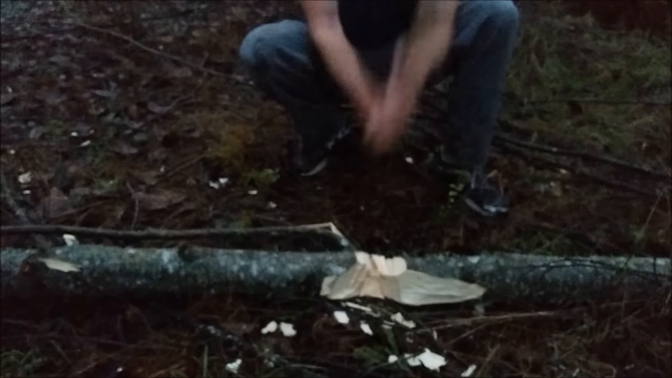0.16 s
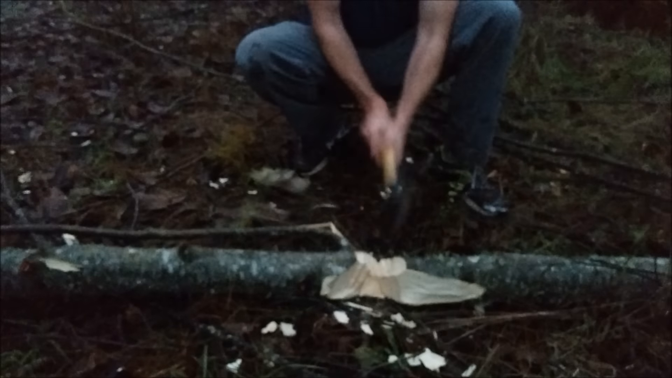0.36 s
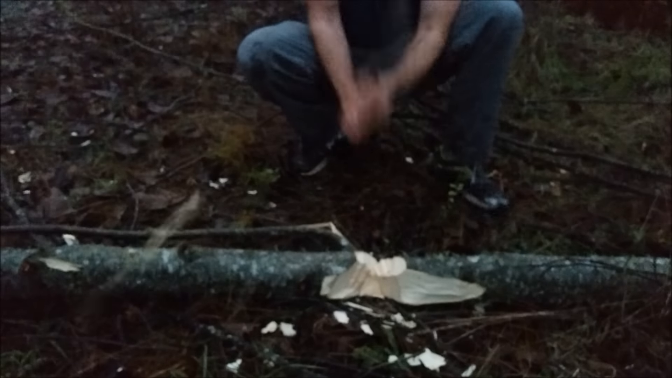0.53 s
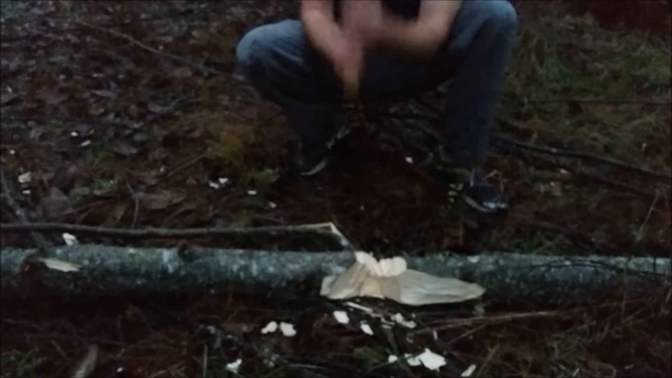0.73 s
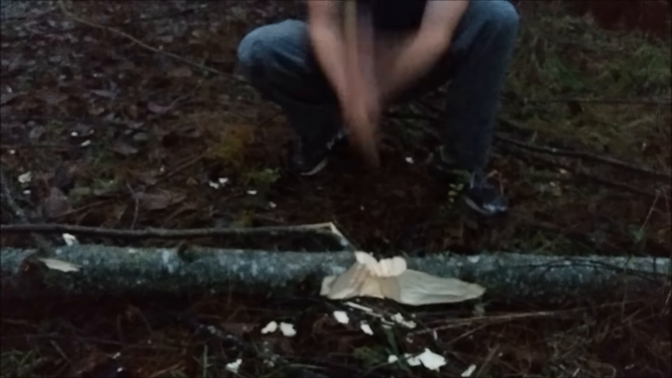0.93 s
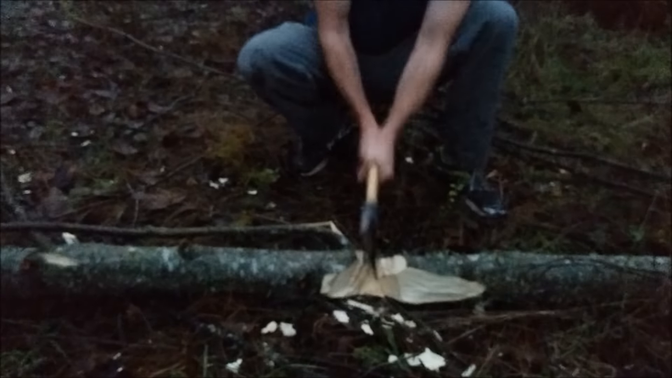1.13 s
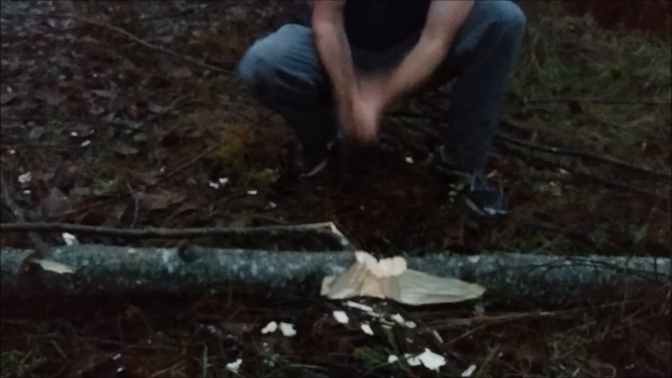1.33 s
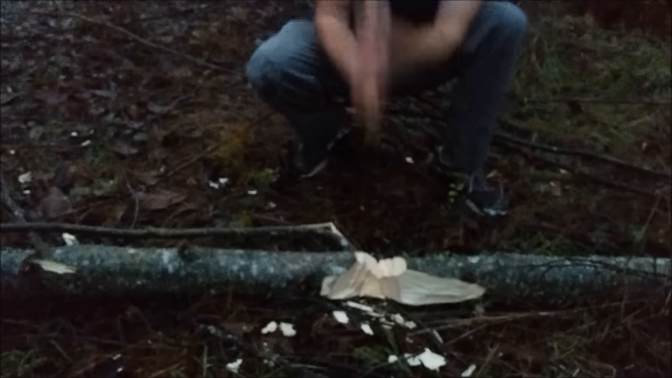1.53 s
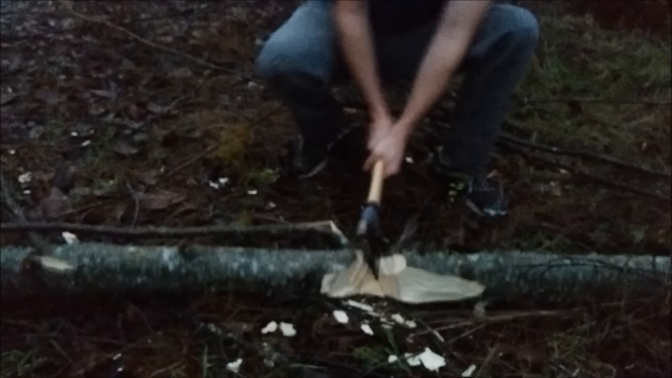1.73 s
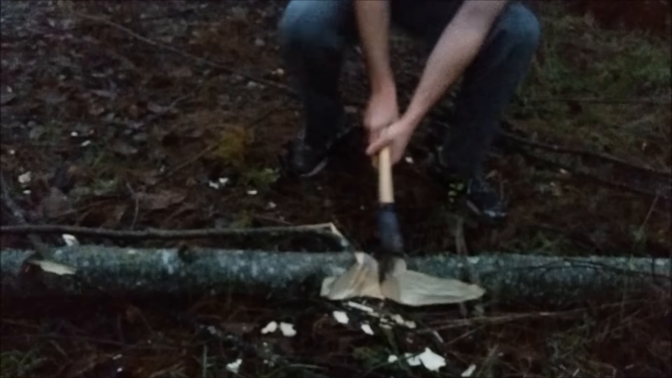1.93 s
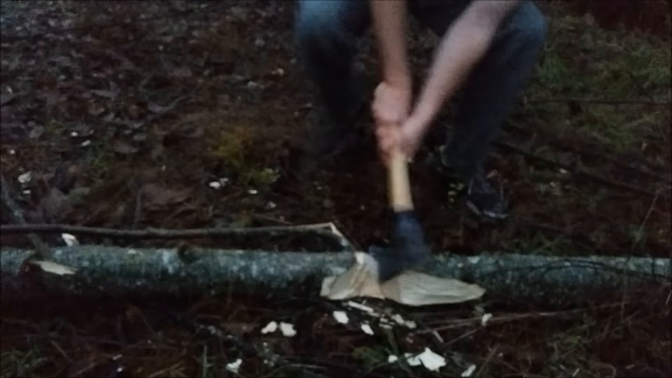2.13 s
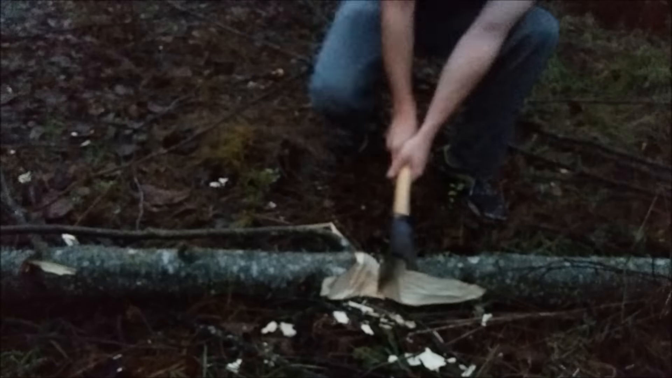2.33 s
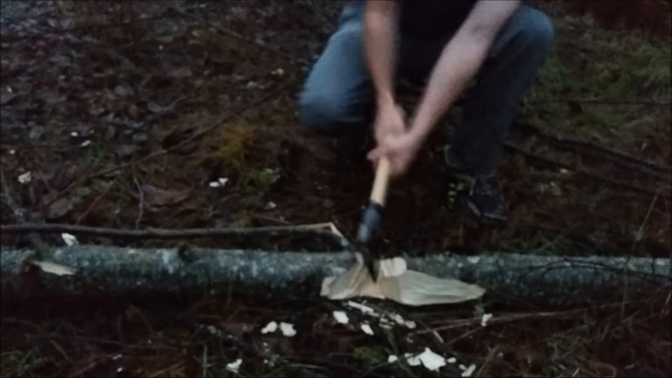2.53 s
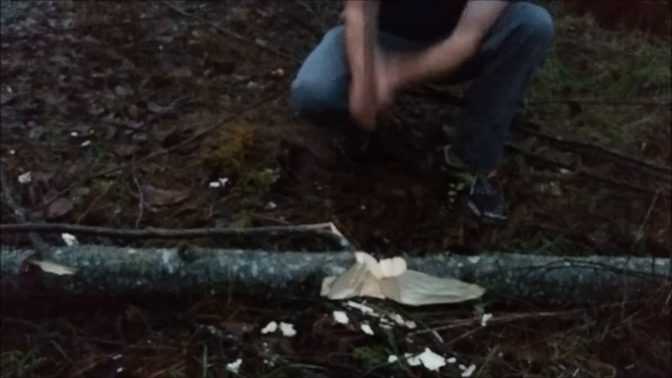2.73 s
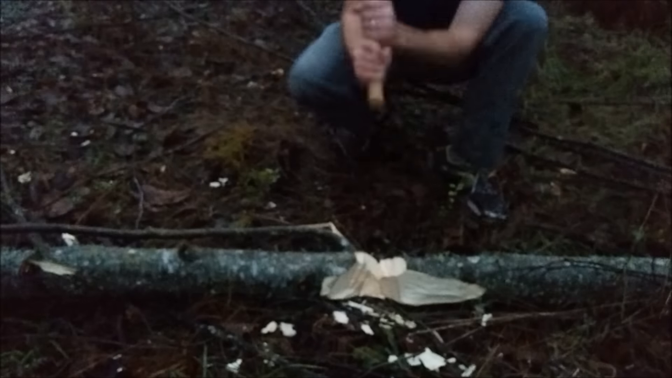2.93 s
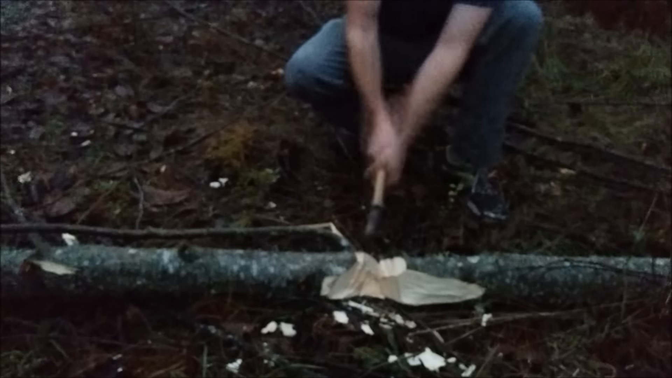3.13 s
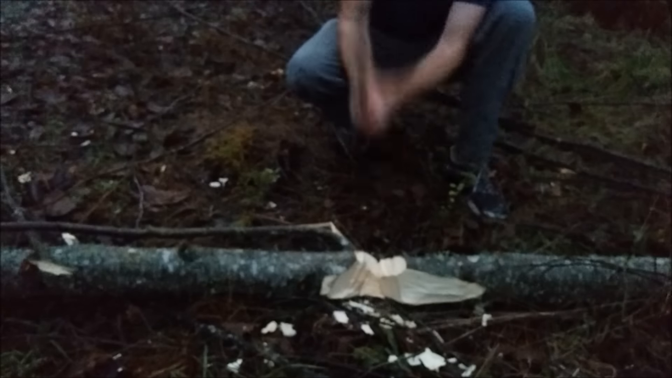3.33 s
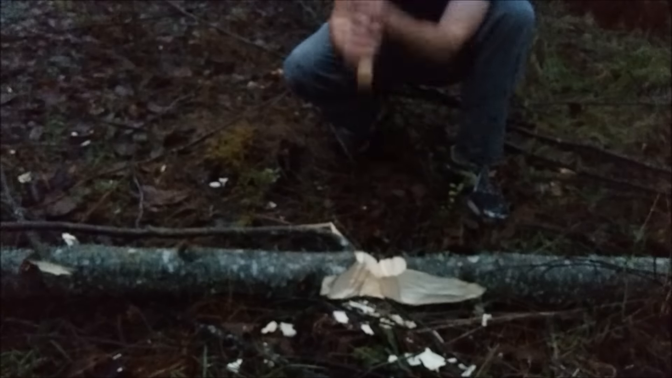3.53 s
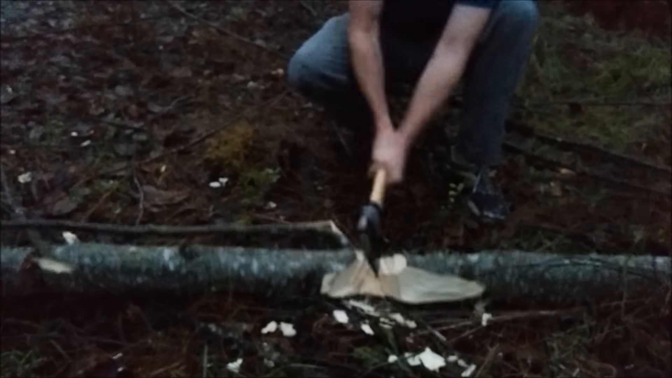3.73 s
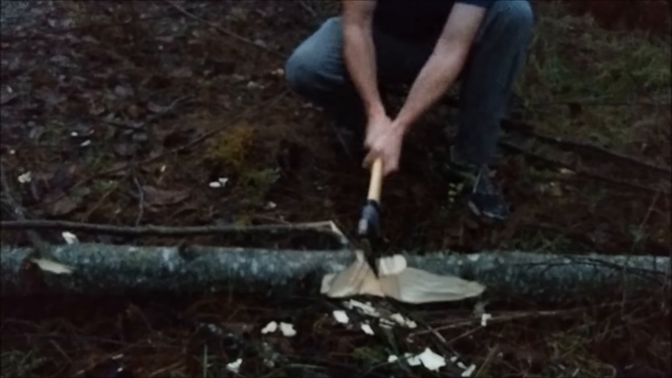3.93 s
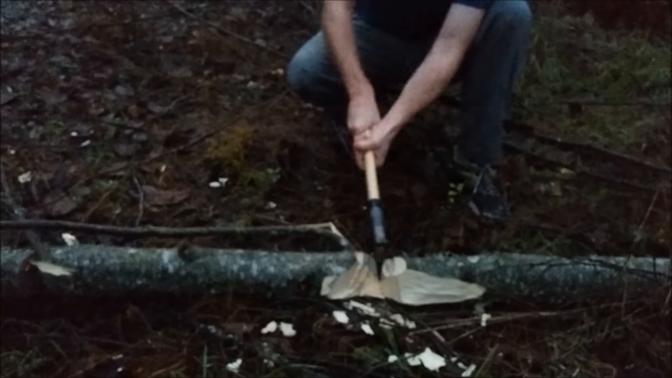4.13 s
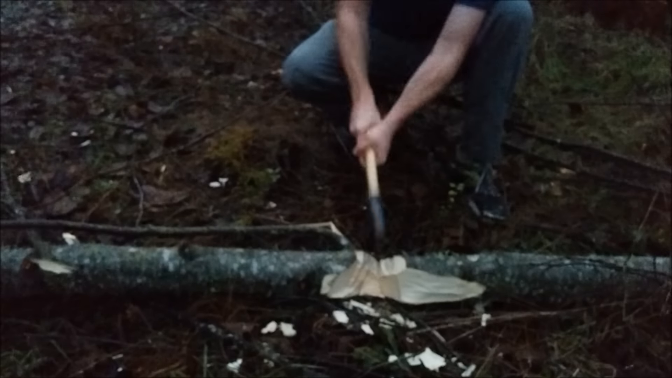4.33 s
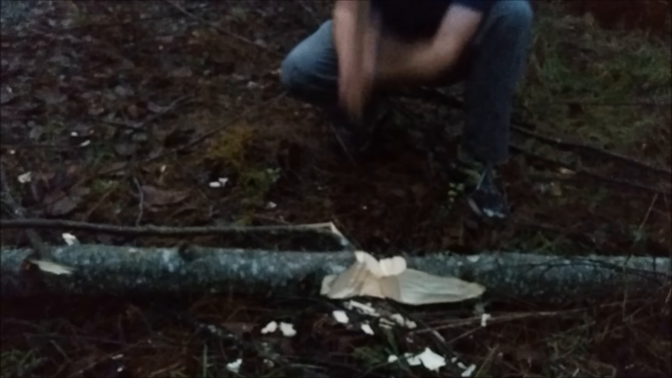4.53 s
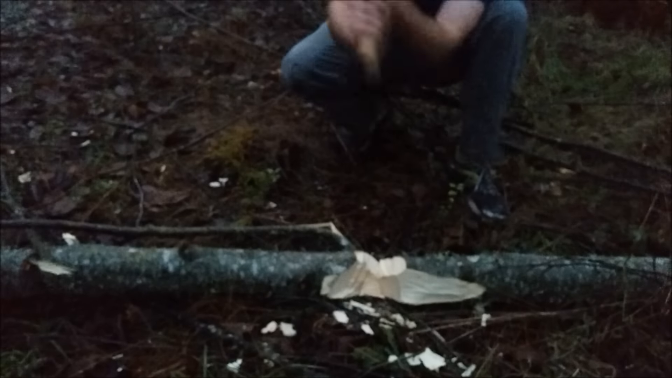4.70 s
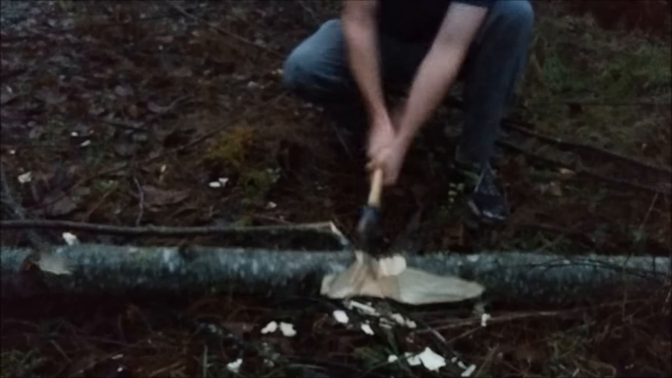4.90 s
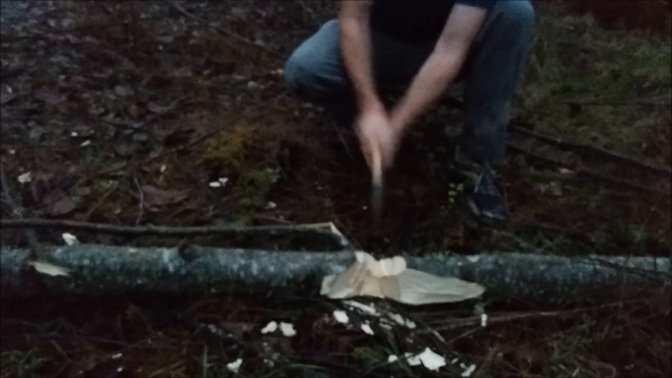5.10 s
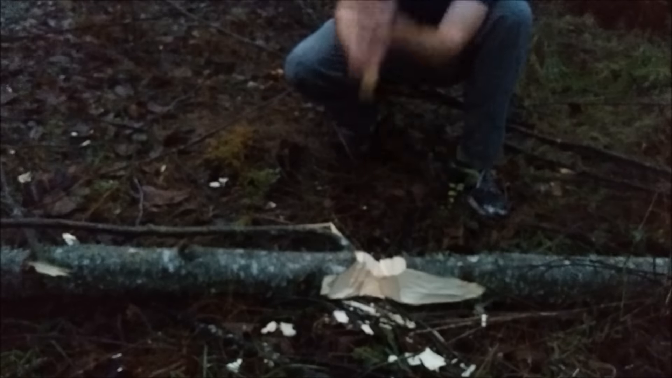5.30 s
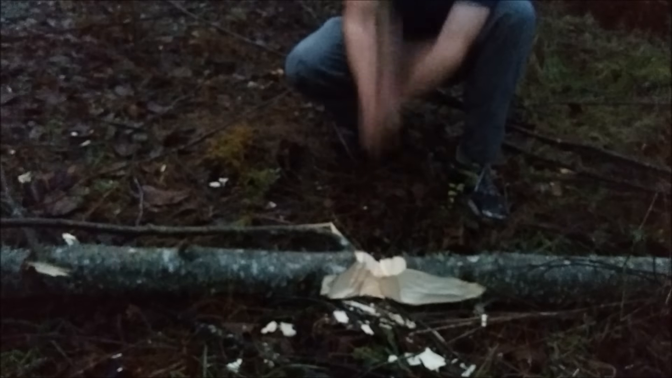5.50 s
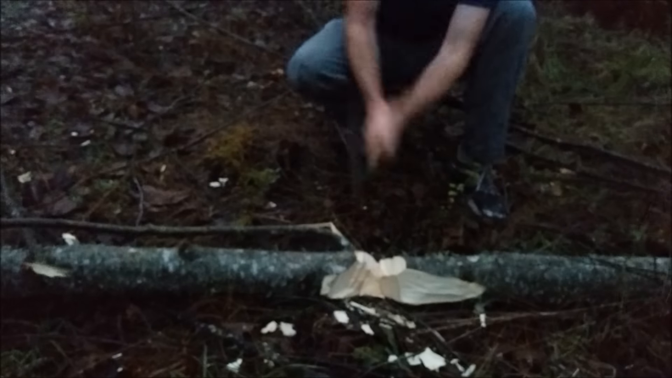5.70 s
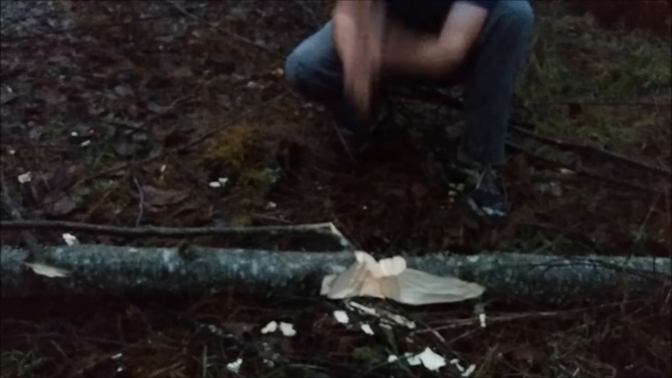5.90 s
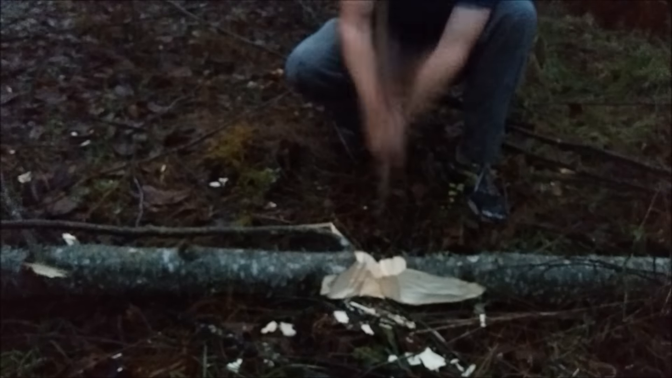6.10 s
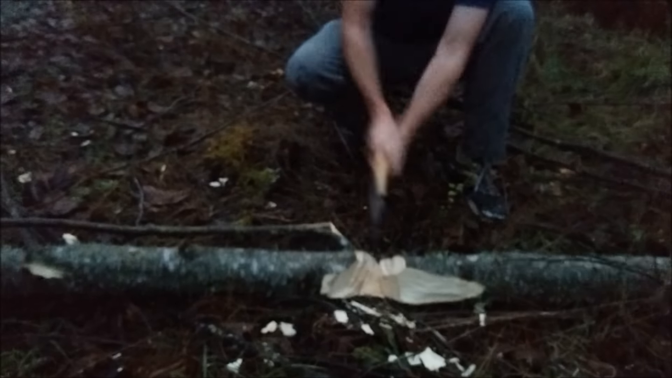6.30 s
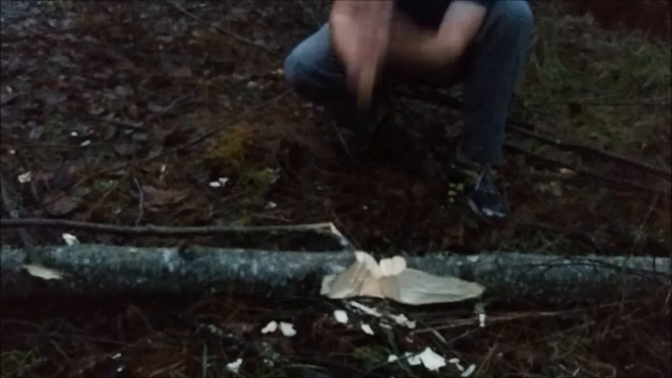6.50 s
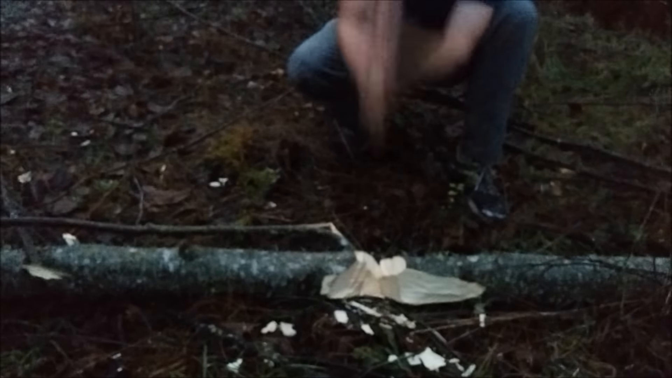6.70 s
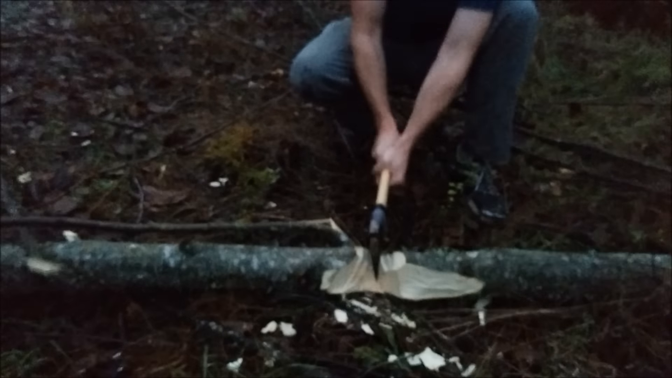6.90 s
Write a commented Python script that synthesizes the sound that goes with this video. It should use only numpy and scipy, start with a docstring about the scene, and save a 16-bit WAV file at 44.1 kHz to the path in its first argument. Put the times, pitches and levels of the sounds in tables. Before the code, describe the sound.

Nine spaced axe strokes crack and knock into a log outdoors, splinters spraying, with a quick blade scrape after the third.

```python
"""A small axe chops a fallen log in a quiet forest, under a faint rush of air whose low murmur wanders.
Three strokes land first: shaped noise cracks and clacks, the log's modes ring low and hollow, grains spray
as splinters, and patchy noise tails scatter each stroke back from near trunks and deep forest.
Then grainy noise scrapes chips from the notch, the blade bumps its side, and chips patter on the litter.
Six more strokes follow; now and then, from before the second stroke on, a chip or the handle ticks."""
import sys
import numpy as np
from scipy import signal
from scipy.fft import rfft, irfft, next_fast_len
from scipy.io import wavfile
from scipy.ndimage import uniform_filter1d, minimum_filter1d, map_coordinates

SR = 44100
rng = np.random.default_rng(int(sys.argv[2]) if len(sys.argv) > 2 else 0)


def to_wav(s):
    """Save 16-bit WAV."""
    ch = np.atleast_2d(s).T  # columns
    pcm = np.round(np.clip(ch, -1, 1) * 32767)  # PCM
    wavfile.write(sys.argv[1], SR, pcm.astype(np.int16))


N = 306495


def amp(db):
    """Decibels to gain."""
    return 10 ** (np.asarray(db) / 20)


def unit(x):
    """Scale to rms 1."""
    return x / np.sqrt(np.mean(x ** 2) + 1e-20)


def along(points, hz):
    """Read (Hz, value) points on a log axis."""
    f, v = np.transpose(points)
    return np.interp(np.log(hz + 1), np.log(f + 1), v)


def coloured(x, spectrum, bright_db=0):
    """Give noise a spectrum and a treble shelf, half its dB at 8 kHz; rms 1."""
    hz = np.fft.rfftfreq(len(x), 1 / SR)
    shelf = bright_db * hz ** 4 / (hz ** 4 + 8000 ** 4)
    gain = amp(along(spectrum, hz) + shelf)
    return unit(irfft(rfft(x) * gain, len(x)))


def noise(spectrum, size, bright_db=0):
    """Smooth noise of rms 1."""
    return coloured(rng.standard_normal(size), spectrum, bright_db)


def grains(spectrum, size, rate, spread_db):
    """Tiny snaps at random times and sizes, rate a second on average; rms 1."""
    snaps = (rng.random(size) < rate / SR) * rng.standard_normal(size)
    return coloured(snaps * amp(spread_db * rng.standard_normal(size)), spectrum)


def patches(size, rate):
    """A smooth random curve with rate knots a second."""
    knots = rng.standard_normal(int(size * rate / SR) + 4)
    return map_coordinates(knots, [np.arange(size) * rate / SR])


def fade(t, t60):
    """Exponential decay, down 60 dB after t60 seconds."""
    return amp(-60 * t / t60)


def rise(t, attack):
    """Smooth onset."""
    return 1 - np.exp(-(t / attack) ** 2)


def until(t, end, order):
    """Stays near 1, then falls away around the time end."""
    return 1 / np.sqrt(1 + (t / end) ** order)


def add(track, s, sound):
    """Mix a sound in at s seconds."""
    part = track[round(s * SR):][:len(sound)]
    part += sound[:len(part)]


def forest_air():
    """A faint rush whose low murmur wanders while the high hiss stays even."""
    # distant air: f/Hz, level/dB per Hz
    air = [(15, -12.5), (35, -17.5), (150, -14), (330, -14.5), (600, -14), (1000, -17.5), (2000, -23),
           (5000, -27), (16000, -32)]
    level_db = -74.5
    rush = noise(air, next_fast_len(N))[:N]
    below_1500_hz = signal.butter(2, 1500, fs=SR, output="sos")
    murmur = signal.sosfiltfilt(below_1500_hz, rush)
    hiss = rush - murmur
    wander = amp(1.6 * patches(N, rate=5.9))
    return amp(level_db) * (hiss + murmur * wander)


def settling():
    """Scraped-out chips patter onto the leaf litter: a shower of grains that swells and thins."""
    # dead leaves: f/Hz, level/dB per Hz
    litter = [(80, -37), (500, 3), (1500, -6), (2500, -4), (2950, 1), (3400, -2), (4200, -8), (6200, -8),
              (8000, -37)]
    shower = np.exp(-((np.arange(N) / SR - 2.48) / 0.11) ** 2)
    return amp(-65.5) * shower * grains(litter, next_fast_len(N), rate=2500, spread_db=0.5)[:N]


def tick(t, db, hz):
    """A brief snap around one broad resonance and its weaker overtone; higher ticks die sooner."""
    # small wood: f/multiple of the pitch, level/dB per Hz
    chip = [(.2, -25.5), (.67, -8), (1, 3), (1.33, -6.5), (1.9, -19), (2.5, -17), (3.2, -24), (6, -56)]
    t60_at_1khz_s, damping_power = 0.026, 0.28
    wood = [(hz * multiple, level) for multiple, level in chip]
    t60 = t60_at_1khz_s * (1000 / hz) ** damping_power
    return amp(db - 4.5) * noise(wood, len(t)) * rise(t, 0.00081) * fade(t, t60)


def ticks():
    """Chips and light touches of the tool, each a short snap of wood."""
    # small wooden contacts: t/s, relative level/dB, pitch f/Hz
    contacts = [(.812, -34, 1400), (2.085, -32, 1550), (2.279, -28, 1420), (2.4187, -43.5, 4480),
                (2.4494, -45, 5250), (2.544, -48, 5110), (3.3366, -23, 1230), (3.431, -49.5, 4370),
                (4.364, -45, 612), (5.327, -55, 4000)]
    track, t = np.zeros(N), np.arange(SR // 4) / SR
    for s, db, hz in contacts:
        add(track, s, tick(t, db, hz))
    return track


def scrape():
    """The blade drags over torn fibres, catching and slipping, and bumps the notch with click and thump."""
    # torn fibres under the blade: f/Hz, level/dB per Hz
    shaving = [(88, -49.5), (150, -17), (419, -8.5), (687, -3), (767, -8), (1210, -1), (1460, -7),
               (1570, -3.5), (1720, -6), (3090, -4.5), (5070, -4.5), (6550, -13), (7870, -38), (12000, -46),
               (15600, -75.5), (22000, -120)]
    # blade against the side of the notch: t/s, relative level/dB
    bumps = [(2.209, -23.5), (2.336, -51.5)]
    # thump of a bump: f/Hz, level/dB per Hz
    bump = [(30, -50), (120, -24), (280, 4), (450, -2), (800, -9), (1400, -14.5), (4000, -46), (10000, -80)]
    # one push through the notch: pressure builds, holds and lets go
    start_s, level_db = 2.1213, -41.5
    attack_s, hold_s, release_t60_s = 0.089, 0.086, 0.087
    since = np.arange(N) / SR - start_s
    released = np.maximum(since - attack_s - hold_s, 0)
    push = np.clip(since / attack_s, 0, 1) * fade(released, release_t60_s)
    pressure = push * amp(level_db + 1.8 * patches(N, rate=140))
    track = pressure * grains(shaving, next_fast_len(N), rate=5900, spread_db=1)[:N]
    t = np.arange(SR // 4) / SR
    for s, db in bumps:
        thump = amp(db) * noise(bump, len(t)) * rise(t, 0.0042) * fade(t, 0.089)
        add(track, s, thump + tick(t, db + 4.5, hz=1160))
    return track


def echoes(sound, t, near_db, far_db, patchy_db):
    """Near trunks scatter a short lumpy answer; the deep forest returns a faint long one."""
    # near trunks: f/Hz, level/dB per Hz
    trunks = [(40, -36), (180, -19), (500, -15), (1200, -0.5), (2300, -1), (3100, -2), (4200, -1),
              (5800, -11.5), (7200, -20), (16000, -20.5)]
    # deep forest: f/Hz, level/dB per Hz
    forest = [(40, -36.5), (300, -20.5), (600, -10), (1000, 3), (1600, 3), (2300, 2), (3100, -8.5),
              (4000, -5), (6000, -20), (16000, -29.5)]
    size = len(t)
    near_lumps = amp(patchy_db * patches(size, rate=93))
    near = noise(trunks, size) * near_lumps * rise(t, 0.028) * fade(t, 0.3) * until(t, 0.15, order=24)
    far_lumps = amp(patchy_db / 2 * patches(size, rate=50))
    far = noise(forest, size) * far_lumps * rise(t, 0.098) * fade(t, 1.2)
    answer = amp(near_db) * near / np.linalg.norm(near) + amp(far_db) * far / np.linalg.norm(far)
    return signal.fftconvolve(sound, answer)[:size]


def log_ring(t, knock_db, tilt_db, clack_db, low_ratio, scatter_db, detune, travel, smear):
    """The log's modes: near-even spacing throbs; slow low bending waves make the knock sweep downward."""
    # bending modes of the log: nominal f/Hz, relative level/dB, t60/s
    modes = [(126, -20, 0.32), (174.76, -16, 0.49), (239.4, -16.5, 0.22), (269, -7.5, 0.24),
             (315, -3, 0.26), (340.4, -8, 0.27), (372, -8.5, .2), (421.5, 2, .17), (474, -7, .17),
             (527.6, -3, 0.18), (562, -6.5, 0.16), (653, -3, .14), (761, -8.5, .13), (823, -7.5, 0.11),
             (917, -12.5, 0.1), (1040, -12.5, 0.26), (1206, -13.5, 0.13), (1407, -12.5, .15),
             (1513, -13, .14), (1936, -14, 0.067)]
    hz, db, t60 = np.transpose(modes)[:, :, None]
    level, tuning, phase = rng.standard_normal((3, len(modes), 1))
    # a harder contact favours the higher modes
    knock_force_db = knock_db + tilt_db * np.log2(hz / 424)
    force_db = np.where(hz < 850, knock_force_db, clack_db + 0.5)
    # only the lowest modes take the stroke's pitch ratio
    pitch = hz * np.where(hz < 300, low_ratio, 1) * (1 + detune * tuning)
    arrival = travel * np.sqrt(400 / hz)
    # bending crests move at half the speed of the wave packet
    ring = np.sin(2 * np.pi * pitch * (t - 2 * arrival) + smear * phase)
    gain = amp(force_db + db + scatter_db * level)
    return np.sum(gain * ring * rise(t, 0.77 * arrival) * fade(t, t60), axis=0)


def chop(t, knock_db, tilt_db, bite, bright_db, impact_db, splinter_db):
    """The edge lands, fibres crack while the blade sinks in, the wood knocks and splinters fly."""
    # parting fibres: f/Hz, level/dB per Hz
    crack_spectrum = [(60, -14), (400, 0), (1000, -3), (2000, 1), (3000, -8), (4200, -6), (5700, 0),
                      (7300, -4), (9500, 1.5), (12000, -6), (16000, -12.5)]
    # hard clack of the wood: f/Hz, level/dB per Hz
    clack_spectrum = [(100, -25), (450, -4), (700, 3.5), (1200, -4), (2200, -12.5), (3000, -25.5),
                      (5000, -25.5), (16000, -35)]
    # low thud of the log: f/Hz, level/dB per Hz
    thud_spectrum = [(20, -12.5), (60, -12), (120, -4), (220, -4), (330, -2), (600, 1), (900, -3.5),
                     (2000, -23), (6000, -62.5)]
    # flying splinters: f/Hz, level/dB per Hz
    splinters = [(500, -17), (2000, -5.5), (3000, -5), (4000, -2), (6000, 0.5), (7300, -1.5), (9500, -1),
                 (12000, -8), (16000, -10.5)]
    # steel axe head: f/Hz, level/dB per Hz
    steel = [(3000, -35.5), (3600, -12), (3950, 1), (4350, -9), (4800, -22), (5400, -15.5), (5800, -7.5),
             (6300, -17), (8000, -45.5)]
    size = len(t)
    # a harder impact clacks louder, by 0.33 dB per dB
    clack_db = -15.5 + 0.33 * impact_db
    # more splinters fly for longer: 0.08 s at -40.5 dB, doubling every 29.5 dB
    spray_time = 0.08 * 2 ** ((splinter_db + 40.5) / 29.5)
    # a duller blow raises the lowest modes a little
    low_ratio = 1.025 - 0.0078 * tilt_db

    impact = amp(impact_db) * np.sin(2 * np.pi * 1300 * t) * fade(t, 0.005)
    # the fibres start to part just after the edge lands; a weak tail outlasts the bite
    parting = rise(t, 0.0005) * (until(t, bite, order=12) + 0.091 * fade(t, 0.091))
    crack = amp(-10.6) * noise(crack_spectrum, size, bright_db - 1.5) * parting
    clack = amp(clack_db + 7) * noise(clack_spectrum, size) * rise(t, 0.00064) * fade(t, 0.085)
    thud = amp(knock_db - 4) * noise(thud_spectrum, size) * rise(t, 0.004) * fade(t, 0.27)
    ring = amp(2.5) * log_ring(t, knock_db, tilt_db, clack_db, low_ratio,
                               scatter_db=2.0, detune=0.0045, travel=0.011, smear=0.76)
    # the log's boom stops short instead of ringing out
    boom = (thud + ring) * until(t, 0.12, order=12)
    fibres = grains(splinters, size, rate=6000, spread_db=0.5)
    flight = rise(t, 0.0025) * fade(t, 0.36) * until(t, spray_time, order=16)
    spray = amp(splinter_db + 6) * fibres * flight
    # the steel head sings faintly
    head = amp(knock_db - 26.5) * noise(steel, size) * fade(t, 0.26)
    return impact + crack + clack + boom + spray + head


def axe():
    """All strokes, each with its own echoes."""
    # axe strokes, levels relative within each layer: t/s, knock level/dB, knock tilt/dB per octave,
    # bite length/s, relative crack brightness/dB, impact level/dB, splinter level/dB, near echo level/dB
    strokes = [(0.3103, -12.5, -1, 0.0056, -4, -12, -29.5, -24.5),
               (1.153, -12.5, 2, 0.0051, -4.5, -2.5, -42.5, -23),
               (1.7463, -14, 3.5, 0.0064, 0, -7, -39.5, -30),
               (3.2029, -13, 1, 0.0037, -6.5, -9, -43.5, -21),
               (3.8032, -12.5, 1.5, 0.0038, -4.5, -5, -41, -18),
               (4.9854, -10.5, 0.5, 0.0042, -3.5, 0, -37.5, -21),
               (5.6393, -10.5, 2, 0.0035, 2, -14, -42, -24),
               (6.2698, -11, -0.5, .0039, 2, -6, -42.5, -17.5),
               (6.8929, -12, 0.5, .0026, -6.5, -1.5, -45, -20.5)]
    track, t = np.zeros(N), np.arange(SR) / SR
    for s, *stroke, echo_db in strokes:
        sound = chop(t, *stroke)
        answer = echoes(sound, t, near_db=echo_db, far_db=echo_db - 25.5, patchy_db=4.8)
        add(track, s, sound + answer)
    return track


def scene():
    """Axe work over the faint rush of forest air, at one microphone."""
    return (forest_air() + settling() + scrape() + ticks() + axe())[None]


def record(dry):
    """A fast limiter holds down the peaks, then a low-pass removes the top of the band."""
    ceiling, top_hz = 0.92, 15900
    needed = np.minimum(1, ceiling / (np.abs(dry) + 1e-9))
    # hold the lowest gain over 21 samples, then smooth it
    gain = uniform_filter1d(minimum_filter1d(needed, size=21), size=21)
    limited = dry * gain
    low_pass = signal.firwin(241, top_hz, window=("kaiser", 11), fs=SR)
    return signal.fftconvolve(limited, low_pass[None], mode="same")


dry = scene()
out = record(dry)
to_wav(out)
```